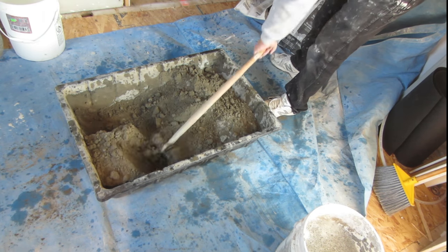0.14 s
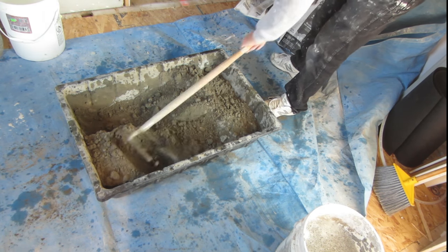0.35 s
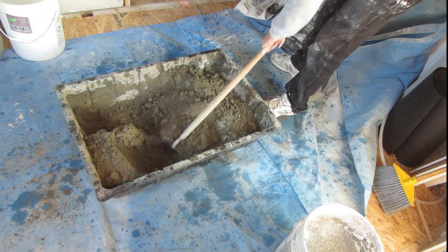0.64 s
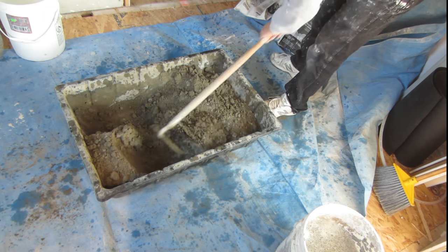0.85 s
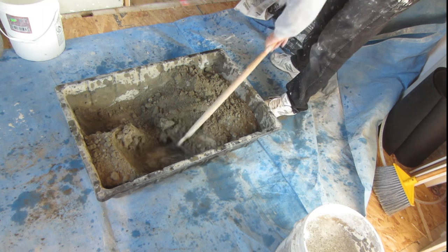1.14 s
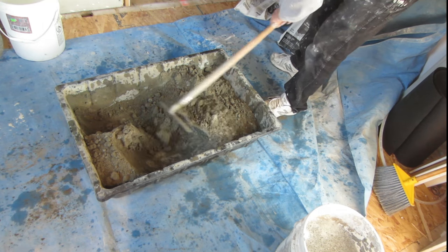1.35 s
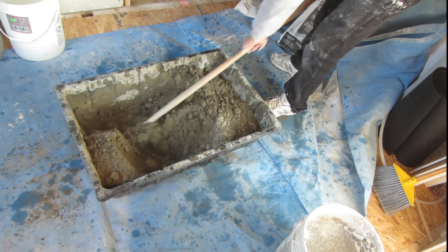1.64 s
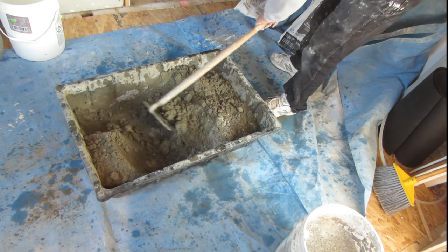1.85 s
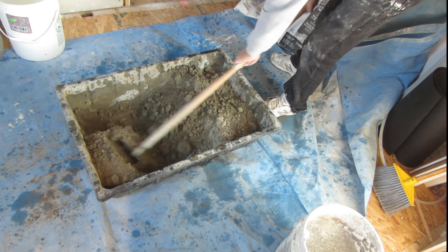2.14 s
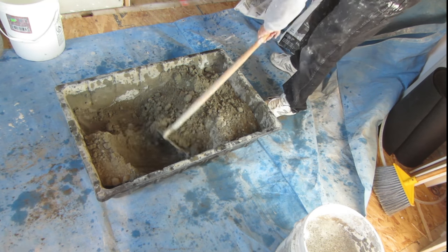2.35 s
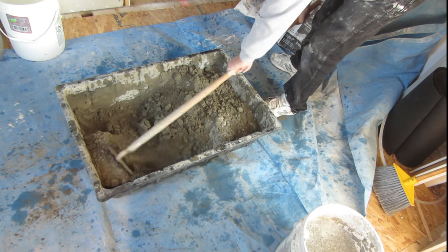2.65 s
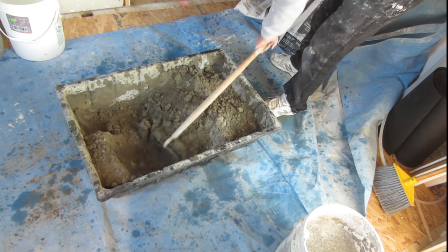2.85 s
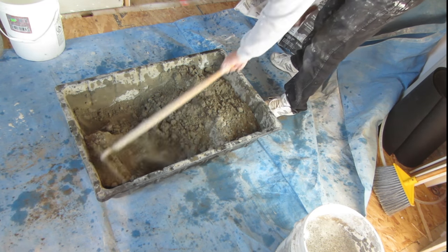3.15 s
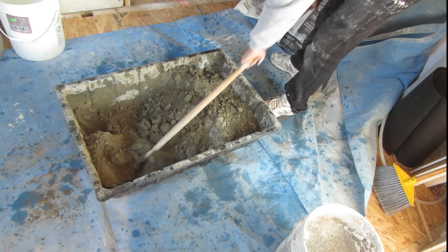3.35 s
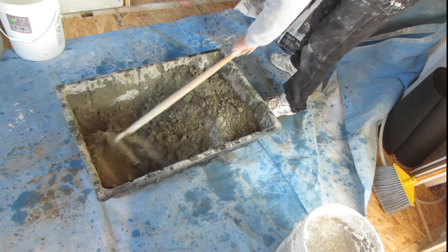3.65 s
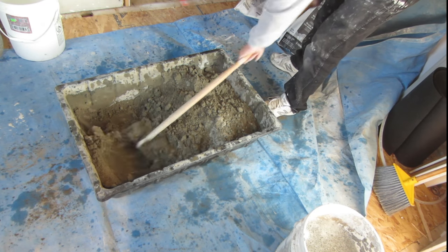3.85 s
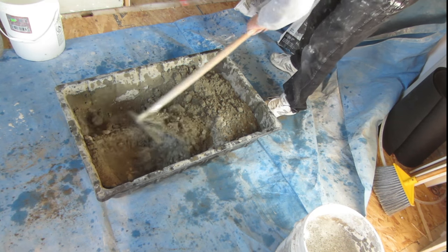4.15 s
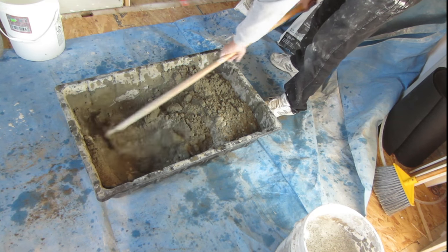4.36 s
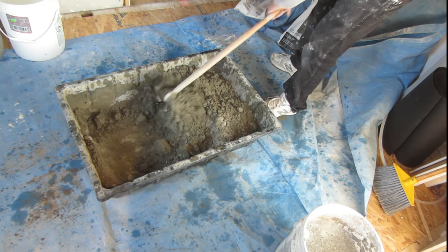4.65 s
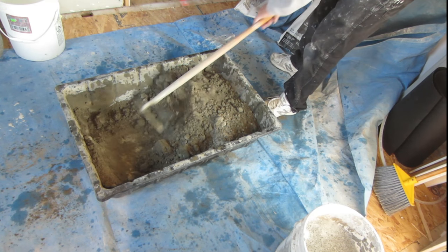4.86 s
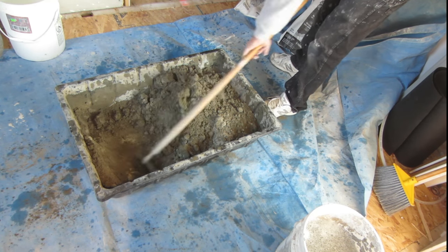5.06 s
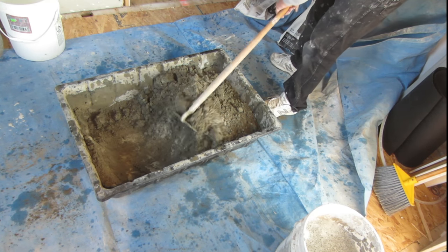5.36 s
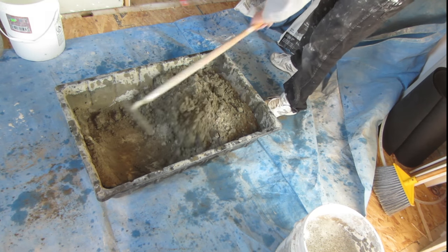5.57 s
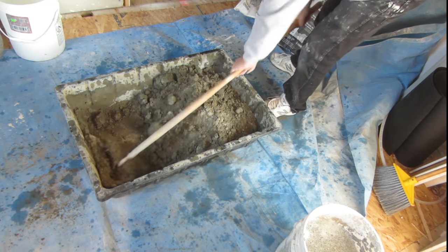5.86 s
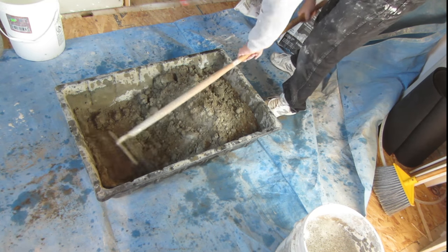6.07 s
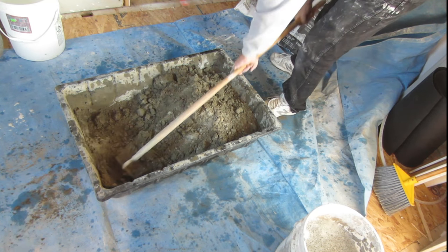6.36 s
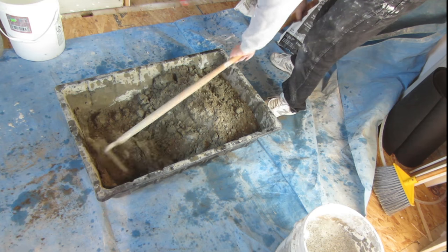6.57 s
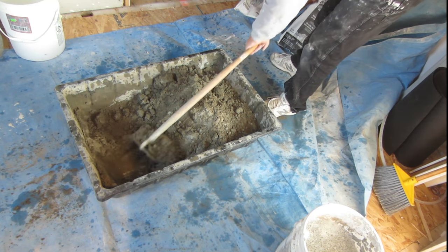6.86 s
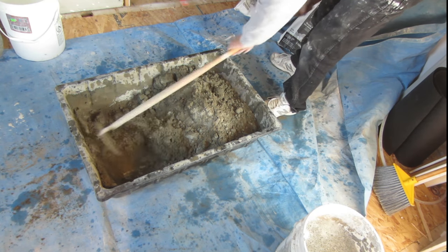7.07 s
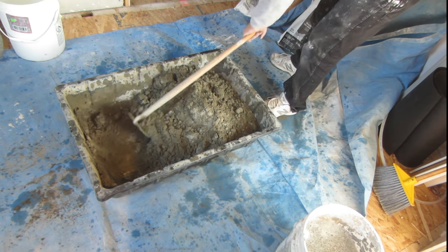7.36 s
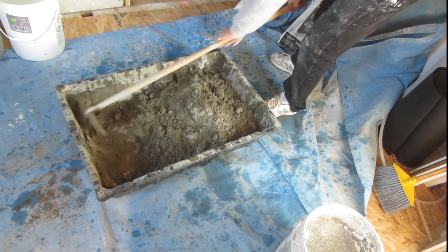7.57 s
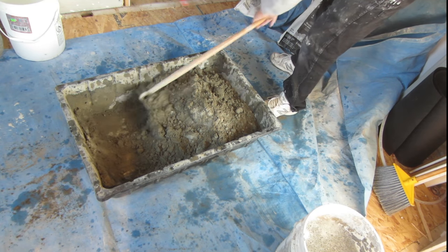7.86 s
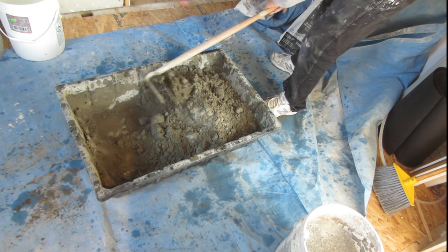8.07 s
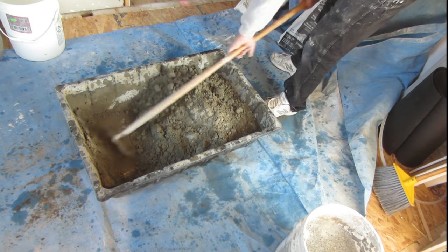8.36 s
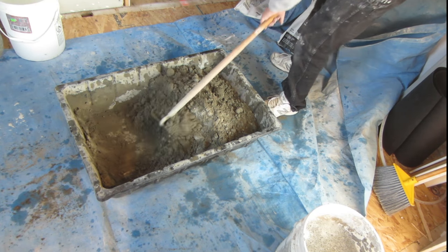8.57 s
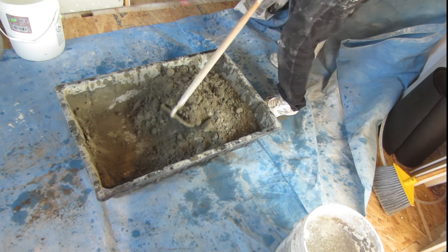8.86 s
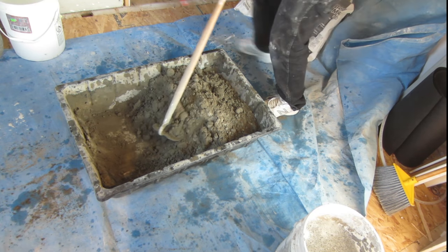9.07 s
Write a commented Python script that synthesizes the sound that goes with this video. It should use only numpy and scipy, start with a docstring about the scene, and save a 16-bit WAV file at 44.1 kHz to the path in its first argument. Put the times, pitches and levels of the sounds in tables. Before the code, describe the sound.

A hoe chops damp sand and cement in a plastic tub, about two gritty crunching strokes a second, with hollow thumps and short room echo.

```python
"""Over a faint hiss, a hoe chops damp sand and cement in a plastic tub, about two strokes a second.
Before many strokes the blade shifts with a soft bump (gently started tub tones) and slides lightly
over the mix (quiet noise that swells). It then bites in with a gritty crunch (tiny random pops and noise),
clicks, cracks the crust (short noise) and thumps the tub (fading tones). The bare room rings on after
every stroke (a fading noise echo). Near the end come two close blows, the first with the hardest wall knock."""
import sys
import numpy as np
from scipy import signal
from scipy.fft import rfft, irfft, next_fast_len
from scipy.io import wavfile

SR = 44100
rng = np.random.default_rng(int(sys.argv[2]) if len(sys.argv) > 2 else 0)


def dump(signal):
    """Clip the signal to [-1, 1] and save it as 16-bit WAV at the path in sys.argv[1]."""
    limited = np.clip(np.atleast_2d(signal).T, -1, 1)
    pcm = np.round(limited * 32767).astype(np.int16)
    wavfile.write(sys.argv[1], SR, pcm)


N = 406602

# All levels below are relative, except the hiss: each layer also gets a gain in scene().
# Faint hiss of the place: (t/s, level/dB)
HISS_LEVEL = [(0, -51), (2.5, -54), (4, -56), (5.6, -60), (7, -54), (8.8, -60), (9.2, -53)]
# Tone of that hiss: (f/Hz, level/dB)
HISS_TONE = [(20, 2.5), (50, -11.5), (100, -0.5), (250, -11), (900, -11.5), (1900, -18.5), (2380, -17.5),
             (2600, -22.5), (3500, -25.5), (7000, -28), (9200, -32), (11500, -53), (16000, -48.5)]
# How long the room's echo takes to fall 60 dB: (f/Hz, fade/s)
ROOM_FADE = [(80, 0.57), (210, 0.32), (500, 0.38), (900, 0.49), (1700, 0.45), (4000, 0.51), (8000, 0.44),
             (12000, 0.4)]
# Tone of the room's echo: (f/Hz, level/dB)
ROOM_TONE = [(100, -13), (400, -2.5), (900, -5), (4000, -10.5), (12000, -11.5)]
# Soft bumps as the blade shifts before a stroke: (t/s, whole bump level/dB, knock level within it/dB)
BUMPS = [(0.525, -33.5, -24.5), (1.07, -33, -10.5), (2.153, -35, -11), (3.83, -38, -13.5),
         (4.404, -40.5, -8), (6.309, -30.5, -8), (6.344, -33, -16), (7.232, -39, -8), (7.7, -36, 0)]
# Light slides over the mix, each lasting until the blade next lands or bites:
# (start t/s, rub level/dB, sand grit level/dB)
SLIDES = [(0.02, -42, -53.5), (0.529, -47, -52.5), (1.029, -49, -56), (1.606, -48, -51), (2.158, -44, -51),
          (2.708, -41.5, -51.5), (3.248, -48, -55), (3.827, -46, -52), (4.392, -44, -56.5),
          (5.003, -59, -64.5), (5.72, -55.5, -67), (6.299, -48, -53), (6.715, -44, -59), (7.222, -55, -62),
          (8.202, -55, -65.5)]
# The blade meets the tub: (t/s, floor thump level/dB, wall knock level/dB, crust crack level/dB,
# edge click level/dB)
BLOWS = [(0.19, -17, -17, -9, -26), (0.623, -11.5, -15, -7, -13.5), (1.16, -13.5, -13, -4.5, -11.5),
         (1.7139, -22.5, -15, -6, -20.5), (1.744, -21.5, -14, -6, -34), (2.2689, -7.5, -7.5, -24, -18),
         (2.827, -4.5, -13, -23, -15.5), (3.421, -10, -13, -26, -18), (3.451, -13.5, -13, -20, -17),
         (3.898, -15.5, -13, -8.5, -20), (3.942, -23, -17, -2, -22), (5.1205, -17.5, -5.5, -31.5, -18),
         (5.828, -16, -11.5, -12, -22), (5.922, -6, -12, -11, -36), (6.379, -5.5, -21, -33, -23.5),
         (6.77, -17, -18, -39, -24), (6.807, -11.5, -10, -3, -19.5), (7.287, -17, -15, -8.5, -33.5),
         (7.319, -16, -9.5, -8, -18), (7.737, -11, -22, -16.5, -23), (7.851, -13.5, -8, -12.5, -22.5),
         (8.357, -52, -30, -29, -61), (8.4196, -6, 1, -9.5, -19.5), (8.433, -4, -10.5, -27, -40)]
# The blade drives into the mix: (t/s, push length/s, crunch level/dB, crunch growth over the push/dB,
# sand grit level/dB, resonance of the pocket behind the blade f/Hz, its lift/dB, heft of the shoved load/dB)
BITES = [(0.139, 0.068, -15.5, 3.5, -22.5, 700, 4, 1), (0.622, 0.052, -16.5, -1.5, -20.5, 1630, 5, -8),
         (1.115, 0.087, -17.5, 10.5, -28, 950, 2, -0.5), (1.714, 0.04, -14, 1, -28.5, 1120, 2, 7.5),
         (2.270, 0.061, -13.5, -2.5, -27, 680, 5, 1), (2.828, .07, -16, -0.5, -27.5, 1780, 0.5, -1.5),
         (3.353, 0.13, -18.5, 5, -26.5, 570, 2.5, -15), (3.900, 0.04, -14.5, -0.5, -27, 457, 2, -15),
         (4.461, 0.062, -12, -7, -28, 835, 5, 3.5), (5.138, 0.049, -13, -8.5, -23, 563, 4, -0.5),
         (5.83, 0.055, -20, -15.5, -31.5, 590, 8, 18), (5.925, .068, -20, 4.5, -33.5, 402, 9.5, 3.5),
         (6.394, 0.054, -18.5, 0.5, -27, 505, 7, 9), (6.788, 0.084, -17.5, -2.5, -29, 800, 1, -10),
         (7.289, 0.075, -15.5, 4.5, -28, 730, 2.5, 8.5), (7.765, 0.076, -14, 1, -25, 1200, 1.5, 6),
         (8.470, 0.071, -22.5, -7, -34.5, 1700, -0.5, -5)]
# Tones of the plastic tub floor under its load: (f/Hz, level/dB, time to fall 60 dB/s)
FLOOR_MODES = [(98.8, -3, 0.18), (122.3, -3.5, 0.083), (138, 3.5, 0.14), (175, 0, 0.11),
               (207.2, -2.5, 0.11), (234.8, -2, 0.13), (295, -7.5, 0.15)]
# Tones of the tub walls and blade: (f/Hz, level/dB, time to fall 60 dB/s)
WALL_MODES = [(261.3, -5, 0.17), (348.5, -5.5, 0.088), (377.3, 0.5, 0.084), (439.2, -4.5, 0.19),
              (517.5, -5.5, 0.08), (659, -1.5, 0.05), (705, -8, 0.21), (860, -11, 0.032),
              (1058, -1.5, 0.026), (1173, -8.5, 0.068)]
# Narrow bands that the open tub adds to the crunch: (f/Hz, width/Hz, level/dB)
TUB_BANDS = [(233, 8.5, -3), (418, 166, -7.5), (518, 58, -13), (693, 29, -0.5), (882, 29, -1.5),
             (1002, 53, -5.5), (1190, 100, -7.5), (1597, 21, -6), (1985, 36, -10.5), (2400, 35, -8),
             (2440, 170, -12)]
# Tone of breaking clods: (f/Hz, level/dB)
CRUNCH_TONE = [(25, -8), (60, -15.5), (130, -5), (300, 0), (550, 0.5), (1100, 0), (1700, -2), (2700, -10),
               (4000, -19.5), (8000, -42.5), (16000, -65.5)]
# Tone of sand on steel, also used for the edge click: (f/Hz, level/dB)
GRIT_TONE = [(300, -36), (1000, 5.5), (1800, 9), (2900, 9.5), (4000, 1), (6000, 2), (8200, -1),
             (10000, -11), (11800, -23.5), (13500, -18.5), (16000, -26)]
# Tone of the sharp crack of the crust: (f/Hz, level/dB)
CRACK_TONE = [(150, -5), (600, -6.5), (1400, 19), (2800, -5.5), (4000, -17.5), (16000, -61.5)]

TOP_HZ = 16000
CLOD_ATTACK_S, CLOD_RELEASE_S = 0.0085, 0.18  # clods start to break; time to fall 60 dB after the push
SAND_ATTACK_S, SAND_RELEASE_S = 0.0029, 0.23
SAND_SAG_DB_PER_S = 73.5  # the hiss weakens as the blade buries itself
SAND_FOLLOW = 0.28  # share of the crunch's growth that the hiss follows


def amp(db):
    """Turn decibels into a gain."""
    return 10 ** (np.asarray(db) / 20)


def unit(x):
    """Scale a sound to an average (rms) strength of 1."""
    return x / np.sqrt(np.mean(x ** 2) + 1e-20)


def along(points, hz):
    """Read values between (f/Hz, value) points, with frequency on a log axis."""
    f, value = np.transpose(points)
    return np.interp(np.log(hz + 1), np.log(f + 1), value)


def filtered(x, response):
    """Multiply the spectrum of x by a response that depends on frequency."""
    size = next_fast_len(len(x) + SR // 2)
    hz = np.fft.rfftfreq(size, 1 / SR)
    return irfft(rfft(x, size) * response(hz), size)[:len(x)]


def coloured(x, tone):
    """Give x a tone of (f/Hz, level/dB) points, using a filter that never sounds ahead of its input."""
    size = 8192
    gain = amp(along(tone, np.fft.rfftfreq(size, 1 / SR)))
    # folding the log spectrum's later half onto the earlier one makes the filter start at once
    cepstrum = irfft(np.log(gain))
    cepstrum[1:size // 2] *= 2
    cepstrum[size // 2 + 1:] = 0
    impulse = irfft(np.exp(rfft(cepstrum)))
    return signal.fftconvolve(x, impulse)[:len(x)]


def add(track, s, sound):
    """Mix a sound into the track at time s."""
    start = max(round(s * SR), 0)
    track[start:start + len(sound)] += sound[:N - start]


def resonance(hz, centre, width):
    """Complex response of one resonance, 1 at its centre."""
    return 1j * hz * width / (centre ** 2 - hz ** 2 + 1j * hz * width)


def lifted(hz, centre, width, lift_db):
    """Response that changes by lift_db around one resonance and stays near 1 elsewhere."""
    return 1 + (amp(lift_db) - 1) * resonance(hz, centre, width)


def push(length, growth_db, attack, release):
    """Half a second of gain: it opens, changes by growth_db over the push, then falls 60 dB in release s."""
    t = np.arange(SR // 2) / SR
    held_db = growth_db * (np.minimum(t / length, 1) - 0.5)
    fade_db = -60 * np.maximum(t - length, 0) / release
    return amp(held_db + fade_db) * (1 - np.exp(-t / attack))


def clumps(per_s, depth_db):
    """Half a second of uneven gain, rms 1: the mix gives way in lumps."""
    count = SR // 2
    knots = rng.standard_normal(count)
    wander = np.interp(np.arange(count) * per_s / SR, np.arange(count), knots)
    return unit(amp(depth_db * wander))


def grains(per_s, spread_db, smooth):
    """Half a second of tiny fractures of very unequal size over a smooth rubbing noise, rms 1."""
    count = SR // 2
    sizes = amp(spread_db * np.minimum(rng.exponential(size=count), 4))
    breaks = rng.random(count) < per_s / SR
    pops = breaks * sizes * rng.choice([-1, 1], count)
    return unit(unit(pops) + smooth * rng.standard_normal(count))


def hollow(hz):
    """The open tub lifts narrow bands of the crunch that sounds inside it."""
    return 1 + sum(amp(db) * resonance(hz, centre, width) for centre, width, db in TUB_BANDS)


def crunch(per_s, spread_db):
    """Damp clods break against the blade and sound through the tub."""
    clods = coloured(grains(per_s, spread_db, smooth=0.39), CRUNCH_TONE)
    return unit(filtered(clods, hollow))


def grit(per_s, spread_db):
    """Sand grains scratch along the steel."""
    return unit(coloured(grains(per_s, spread_db, smooth=0.61), GRIT_TONE))


def burst(tone, t, fade_s):
    """Noise of a given tone that starts at once and falls 60 dB in fade_s."""
    return unit(coloured(rng.standard_normal(len(t)), tone)) * amp(-60 * t / fade_s)


def ring(modes, t, attack):
    """Struck plastic sounds as fading tones, with new strengths for each blow, peak 1."""
    sound = np.zeros(len(t))
    chance = rng.standard_normal((len(modes), 2))
    for (hz, db, t60), (size, side) in zip(modes, chance):
        level = amp(db + 2 * size - 60 * t / t60)
        sound += np.sign(side) * level * np.sin(2 * np.pi * hz * t)
    sound = sound * (1 - np.exp(-t / attack))
    return sound / np.abs(sound).max()


def hiss():
    """Toned noise whose faint level drifts slowly."""
    level_db = np.interp(np.arange(N) / SR, *np.transpose(HISS_LEVEL))
    return amp(level_db) * unit(coloured(rng.standard_normal(N), HISS_TONE))


def room(x, delay, build):
    """The walls' diffuse answer: a noise echo in which each frequency dies at its own speed."""
    hz, t, noise = signal.stft(rng.standard_normal(SR), SR, nperseg=256)
    fade = amp(-60 * t / along(ROOM_FADE, hz)[:, None])
    tail = signal.istft(noise * fade, SR, nperseg=256)[1]
    since = np.maximum(np.arange(len(tail)) / SR - delay, 0)
    tail = tail * (1 - np.exp(-since / build))
    echo = signal.fftconvolve(x, tail / np.linalg.norm(tail))[:N]
    return coloured(echo, ROOM_TONE)


def bumps(thump_db, knock_db, crack_db):
    """Cushioned by mortar, the shifting blade only nudges the tub and breaks a little crust."""
    track, t = np.zeros(N), np.arange(SR // 3) / SR
    for s, db, knock in BUMPS:
        floor = amp(thump_db) * ring(FLOOR_MODES, t, attack=0.0058)
        walls = amp(knock + knock_db) * ring(WALL_MODES, t, attack=0.0012)
        crust = amp(knock + crack_db) * burst(CRACK_TONE, t, fade_s=0.039)
        add(track, s, amp(db) * (floor + walls + crust))
    return track


def slides(rub_db, grit_db, swell_db):
    """The blade skims loose crumbs, gathering speed until it next lands or bites."""
    track, landings = np.zeros(N), np.array([row[0] for row in BITES + BLOWS])
    for s, db, sand_db in SLIDES:
        length = landings[landings > s].min() - s
        rub = crunch(per_s=3400, spread_db=5) * push(length, swell_db, attack=0.0165, release=0.036)
        sand = grit(per_s=5400, spread_db=0.5) * push(length, swell_db, attack=0.0027, release=0.05)
        add(track, s, amp(db + rub_db) * rub + amp(sand_db + grit_db) * sand)
    return track


def blows(thump_db, knock_db, crack_db, click_db):
    """The blade lands: its edge clicks, the crust cracks, the walls knock and the floor thumps."""
    track, t = np.zeros(N), np.arange(SR // 3) / SR
    for s, thump, knock, crack, click in BLOWS:
        edge = amp(click + click_db) * burst(GRIT_TONE, t, fade_s=0.12)
        crust = amp(crack + crack_db) * burst(CRACK_TONE, t, fade_s=0.12)
        floor = amp(thump + thump_db) * ring(FLOOR_MODES, t, attack=0.0012)
        walls = amp(knock + knock_db) * ring(WALL_MODES, t, attack=0.00078)
        add(track, s, floor + walls + crust + edge)
    return track


def bites(crunch_db, grit_db, pocket_q, load_hz, load_width_hz):
    """The blade drives in: clods crumble, the pocket behind it resounds and sand hisses on the steel."""
    track = np.zeros(N)
    for s, length, db, growth_db, sand_db, pocket_hz, lift_db, heft_db in BITES:
        def pocket_and_load(hz):
            """The pocket colours the crunch; a heavier load presses on the tub and deepens it."""
            pocket = lifted(hz, pocket_hz, pocket_hz / pocket_q, lift_db)
            return pocket * lifted(hz, load_hz, load_width_hz, heft_db)

        clods = unit(filtered(crunch(per_s=2200, spread_db=3.5), pocket_and_load))
        clods = clods * push(length, growth_db, CLOD_ATTACK_S, CLOD_RELEASE_S)
        sand_growth_db = SAND_FOLLOW * growth_db - SAND_SAG_DB_PER_S * length
        sand = grit(per_s=6000, spread_db=3.0)
        sand = sand * push(length, sand_growth_db, SAND_ATTACK_S, SAND_RELEASE_S)
        bite = amp(db + crunch_db) * clods + amp(sand_db + grit_db) * sand
        add(track, s, clumps(per_s=139.0, depth_db=1.0) * bite)
    return track


def scene():
    """A faint hiss, the hoe in its tub and the room's answer."""
    hoe = bumps(thump_db=-2.0, knock_db=-1.5, crack_db=-11.5)
    hoe = hoe + slides(rub_db=-9.0, grit_db=-2.0, swell_db=10.5)
    hoe = hoe + blows(thump_db=-2, knock_db=-2.5, crack_db=-13.5, click_db=-8.5)
    hoe = hoe + bites(crunch_db=-1.5, grit_db=-2.0, pocket_q=2.85, load_hz=246, load_width_hz=65)
    walls = room(hoe, delay=0.0046, build=0.0014)  # both in s
    return (hiss() + walls + hoe)[None]


def record(dry):
    """Peaks are cut off flat at full scale, then everything from TOP_HZ up is removed."""
    clipped = np.clip(dry[0], -1, 1)
    return filtered(clipped, lambda hz: hz < TOP_HZ)[None]


dry = scene()
out = record(dry)
dump(out)
```